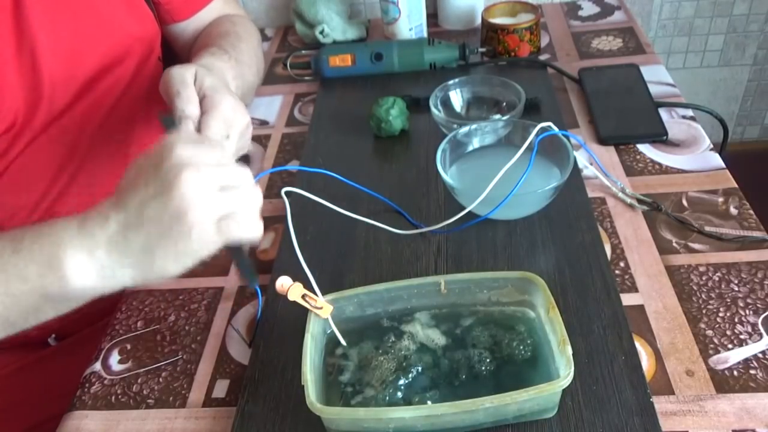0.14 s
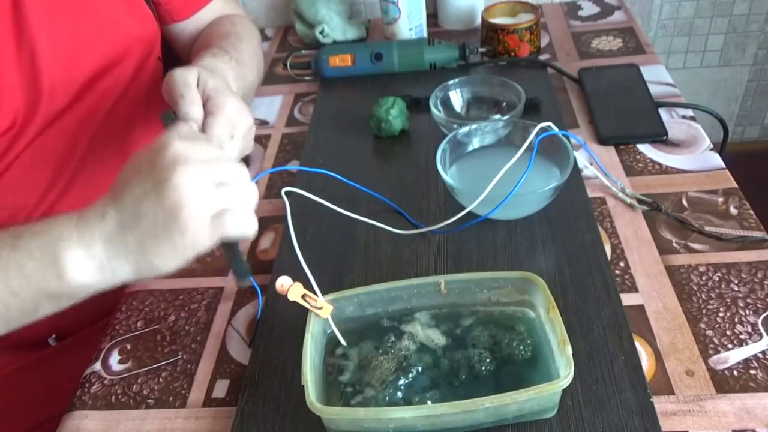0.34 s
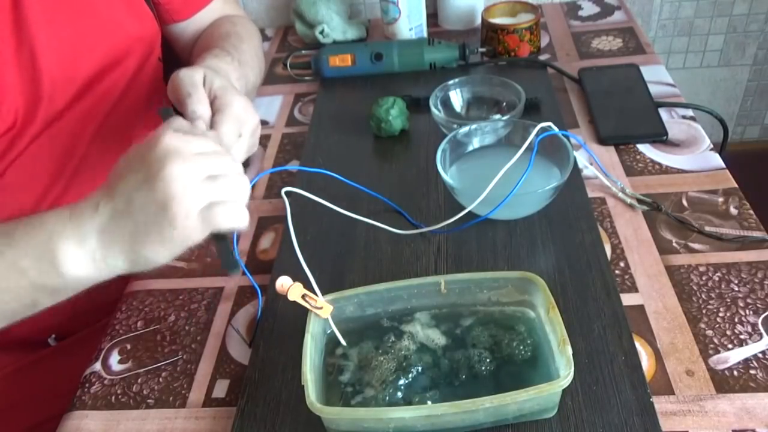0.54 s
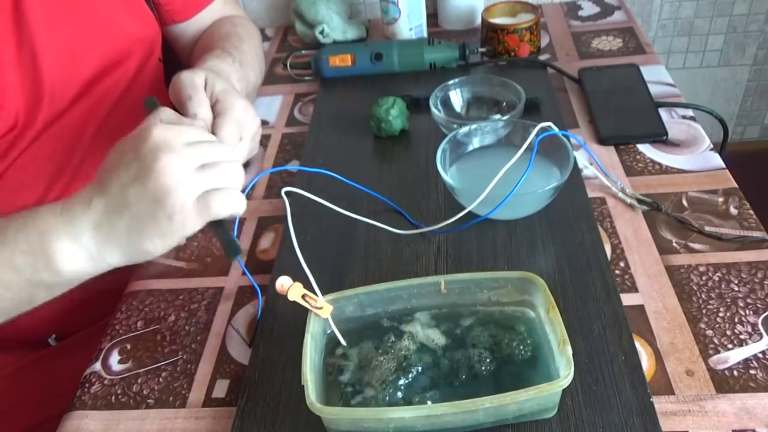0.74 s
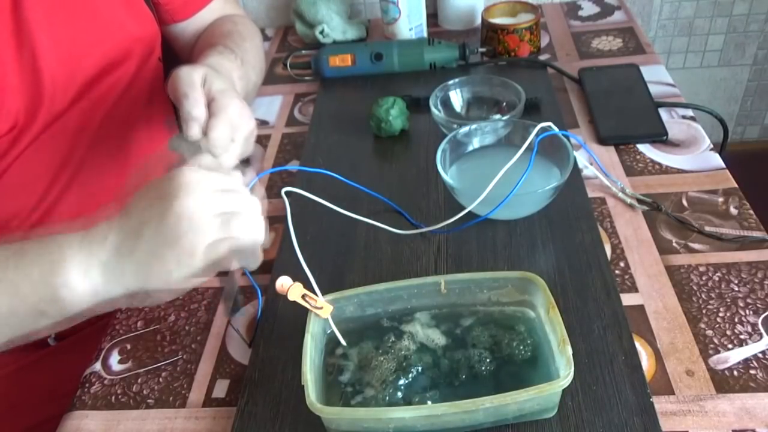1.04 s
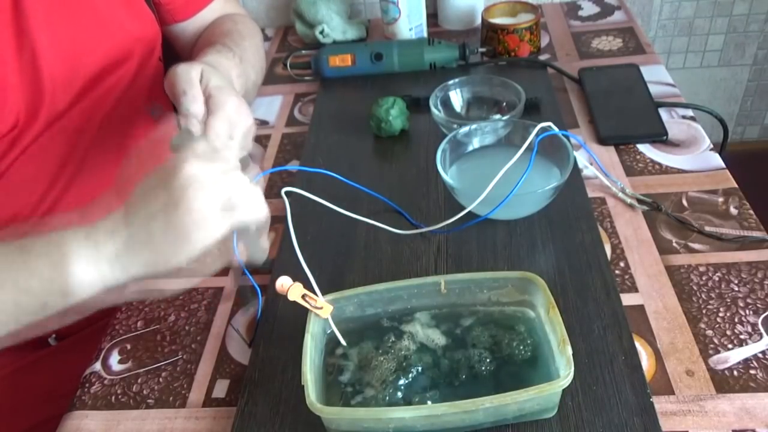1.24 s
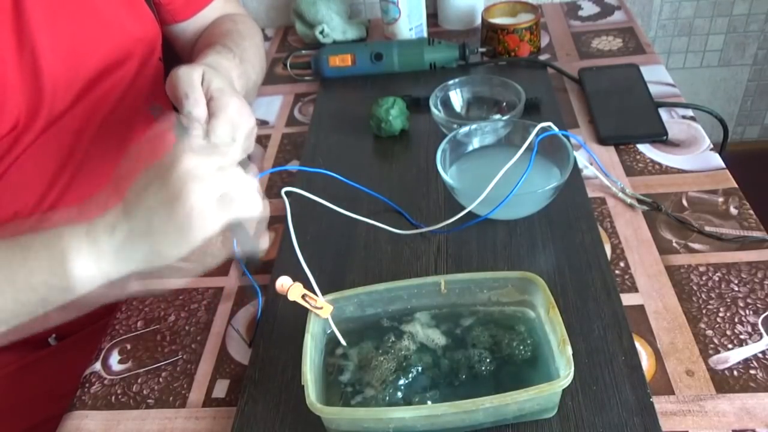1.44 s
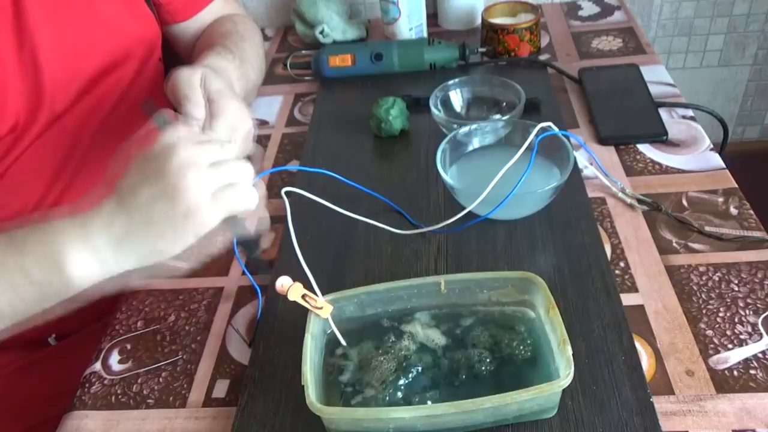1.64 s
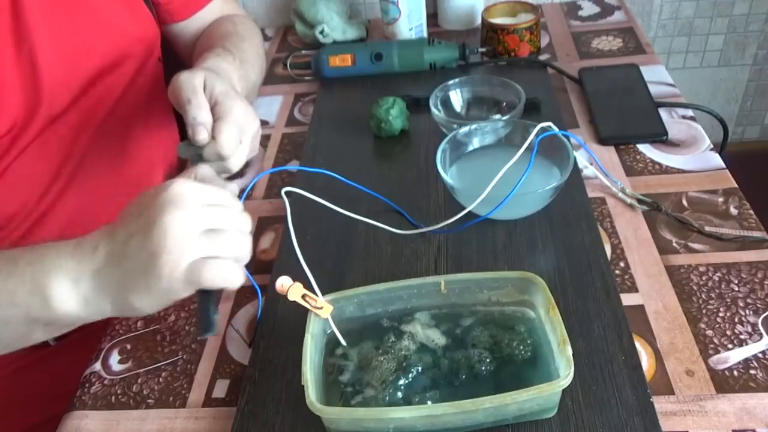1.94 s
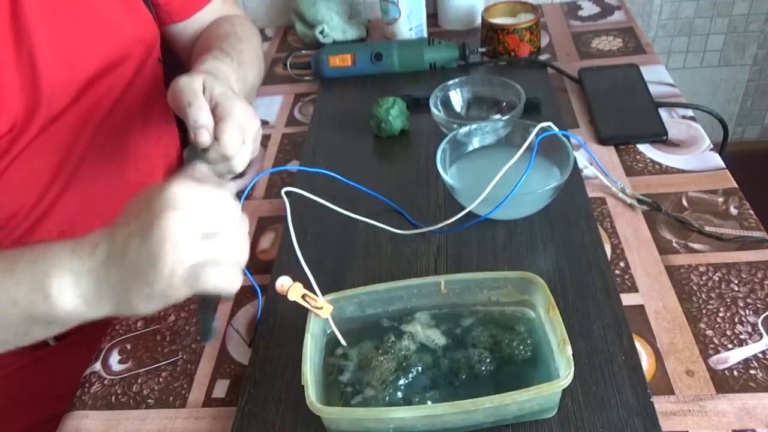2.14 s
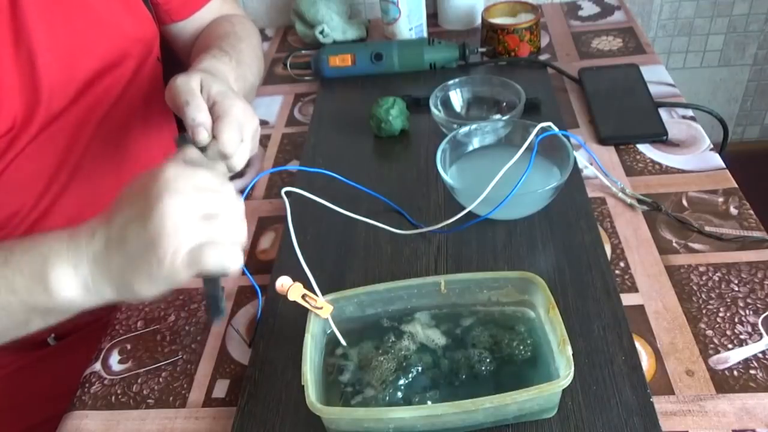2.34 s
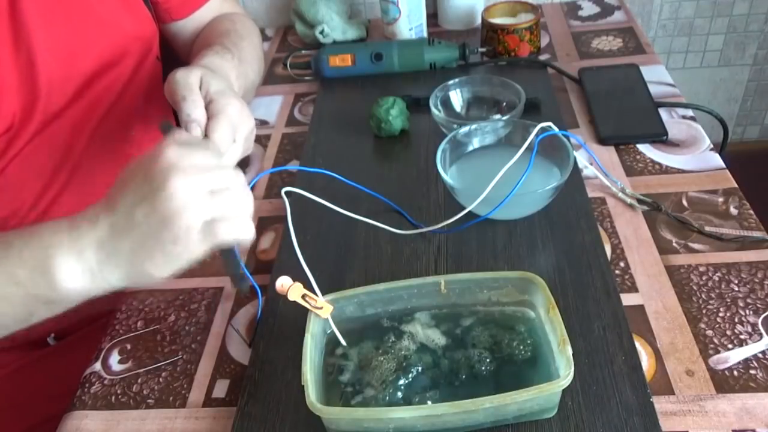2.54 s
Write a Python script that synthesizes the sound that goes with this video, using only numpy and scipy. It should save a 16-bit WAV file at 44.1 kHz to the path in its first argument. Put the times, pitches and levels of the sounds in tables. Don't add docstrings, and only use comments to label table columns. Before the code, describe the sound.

A steel wire brush scrubs a small metal coin in quick, bright, scratchy strokes indoors

```python
import sys
import numpy as np
from scipy import signal
from scipy.fft import rfft, irfft
from scipy.io import wavfile
from scipy.ndimage import uniform_filter1d

SR = 44100
rng = np.random.default_rng(int(sys.argv[2]) if len(sys.argv) > 2 else 0)


def waveform_to_disk(signal):
    frames = np.transpose(np.atleast_2d(signal))
    scaled = np.clip(frames, -1, 1) * 32767
    samples = np.round(scaled).astype(np.int16)
    wavfile.write(sys.argv[1], SR, samples)


def volts(x):
    e = np.asarray(x, float) / 20
    return 10 ** e


N = 119070

# start_s, tick_db, drag_db, tick_pitch_hz
TOUCHDOWNS = [(0.0751, -23, -54, 4830), (0.2828, -22, -49.5, 4500), (0.5023, -20, -54, 6800),
              (0.7284, -30, -51, 7140), (0.9497, -44, -55, 8900), (1.1722, -30, -58.5, 5240),
              (1.381, -49, -51.5, 9330), (1.607, -31, -66, 8700), (1.8382, -29.5, -56, 8200),
              (2.0425, -31, -57, 7430), (2.2697, -37, -68, 9180), (2.4942, -36, -56, 9100)]
# time_s, snap_db, long_wire_pluck_db, shortest_wire_lift_db, ring_pitch_hz
RIM_SNAPS = [(0.1726, -14, -80, 6.5, 2793), (0.371, -5, -42, -11, 2786), (0.5927, -0.5, -41, -11, 3061),
             (0.815, -2, -50, 3, 3070), (1.0348, -8, -75, -5, 3241), (1.256, -16, -44.5, -1.8, 2795),
             (1.4754, -32, -48, -2, 3220), (1.6859, -5.5, -68, -0.3, 3138), (1.9145, -9, -66, 3.6, 2790),
             (2.1308, -4.5, -48, 1.7, 3060), (2.3552, -1, -42, -16, 3026), (2.56, -22, -68, 2.7, 2800)]
# centre_hz, spread_hz, level_db
WIRE_FAMILIES = [(2430, 140, -21), (3112, 300, -13.5), (4185, 430, -16), (4864, 237, -10),
                 (6120, 1540, -18), (7700, 410, -7.5), (9130, 1280, -7.5), (9610, 650, -0.4),
                 (10640, 580, -3.16)]
SLIPS_PER_S = 6000
DRAG_FADE_S = 0.068
ECHO_LIKENESS = 0.7


def across(table, hz):
    f, v = np.array(table, float).T
    return np.interp(np.log(np.maximum(hz, 1)), np.log(f), v)


def shape(x, gain):
    return irfft(rfft(x) * gain(np.arange(N // 2 + 1) * SR / N), N)


def low_cut(hz, order):
    return lambda f: 1 / (1 + (hz / (f + 1)) ** order)


def unit(x):
    return x / np.sqrt(np.mean(x ** 2))


def mode(x, hz, t60):
    r = np.exp(-np.log(1000) / (t60 * SR))
    ring = signal.lfilter([1], [1, -r * np.exp(2j * np.pi * hz / SR)], x).imag
    return np.sqrt(2 * (1 - r * r)) * ring


def band(hz, width):
    return unit(shape(rng.standard_normal(N), lambda f: 1 / (1 + (2 * (f - hz) / width) ** 2)))


def walk(size):
    once = uniform_filter1d(rng.standard_normal(N), size)
    return unit(uniform_filter1d(once, size))


def burst(t, at, fade_s):
    return (t >= at) * np.exp(-np.maximum(t - at, 0) / fade_s)


def pair(make, like):
    mid = shape(make(), lambda f: np.sqrt((1 + np.clip(like(f), 0, 1)) / 2))
    side = shape(make(), lambda f: np.sqrt((1 - np.clip(like(f), 0, 1)) / 2))
    return np.array([mid + side, mid - side])


def hum():
    # frequency_hz, density_db (per Hz)
    air_spectrum = [(25, -27), (110, -10), (531, 0), (1200, 2), (2200, -5), (4000, -6.5), (6500, -10),
                    (11000, -25)]
    # centre_hz, width_hz, level_db
    appliance = [(186.5, 28, -77.5), (121.4, 6.7, -90.5), (1226, 176, -64.5)]
    # frequency_hz, likeness (0 to 1)
    likeness = [(30, .1), (60, .5), (125, 1), (500, 0.1), (1000, 0.37), (4000, 0.37)]

    def room_tone():
        air = unit(shape(rng.standard_normal(N), lambda f: volts(across(air_spectrum, f))))
        return volts(-58) * air + sum(volts(db) * band(hz, width) for hz, width, db in appliance)

    return pair(room_tone, lambda f: across(likeness, f))


def earlier_tail(t):
    def tail():
        colour = sum(volts(db) * band(hz, 2 * spread_hz) for hz, spread_hz, db in WIRE_FAMILIES)
        return colour * volts(-48 - 60 * t / 0.22)

    return pair(tail, lambda f: ECHO_LIKENESS + 0 * f)


def echo(x, t):
    low_t60_s, high_t60_s, level_db = 0.3, 0.18, -8.5

    def tail():
        low = shape(rng.standard_normal(N), lambda f: 1 / np.sqrt(1 + (f / 5000) ** 4))
        high = shape(rng.standard_normal(N), lambda f: 1 / np.sqrt(1 + (5000 / (f + 1)) ** 4))
        build_up = np.clip((t - 0.002) / 0.012, 0, 1)
        h = (low * volts(-60 * t / low_t60_s) + high * volts(-60 * t / high_t60_s)) * build_up
        return signal.fftconvolve(x, h[:SR // 2] / np.sqrt(np.sum(h ** 2)))[:N]

    return volts(level_db) * pair(tail, lambda f: ECHO_LIKENESS + 0 * f)


def light_drag(t, lift_db):
    return sum(volts(drag_db + lift_db) * burst(t, s, DRAG_FADE_S) * (t < s + 0.07)
               for s, _, drag_db, _ in TOUCHDOWNS)


def pressure(t):
    # start_s, length_s, level_db, long_wire_lift_db, swell_db
    strokes = [(0.117, 0.074, -28.5, 1.5, 1.5), (0.326, 0.063, -25, 0.1, 4.5), (0.543, 0.065, -25, -1.2, 6),
               (0.771, 0.062, -26, 2.8, 3.5), (0.992, 0.059, -24.5, 0.7, 5.5), (1.218, 0.057, -27, -0.1, 1),
               (1.431, 0.066, -29, 1.8, 1), (1.651, 0.058, -27.5, 2.2, 2.5), (1.873, 0.062, -28, 0.3, 2.5),
               (2.086, 0.066, -25.5, 1.2, 8), (2.305, 0.071, -29, -0.7, 2), (2.522, 0.075, -26.5, 0.7, 7.5)]
    rise_db_per_s, attack_s, start_db = 885, 0.0053, -1
    release_db_per_s, release_s = 920, 0.017
    out = np.zeros((2, N))
    for s, length, db, long_lift, swell in strokes:
        end = s + length - release_s
        hold = np.interp(t, [s, s + attack_s, end], [start_db - swell, -swell, 0])
        rise = rise_db_per_s * np.maximum(s - t, 0)
        release = release_db_per_s * np.maximum(t - end, 0)
        out += volts(db + hold - rise - release) * volts(np.array([[long_lift], [0]]))
    return out + light_drag(t, 0)


def hand_rub(force):
    # centre_hz, width_hz, level_db
    body = [(566, 420, -35), (1690, 2700, -41.5)]
    rub = force[1] * sum(volts(db) * band(hz, width) for hz, width, db in body)
    return shape(rub, low_cut(300, 4))


def ticks(t):
    signs = rng.choice([-1, 1], size=N)
    out = np.zeros(N)
    for s, db, _, hz in TOUCHDOWNS:
        thin = lambda f: (0.36 + 1 / (1 + ((f - hz) / 1300) ** 2)) / (1 + (3500 / (f + 1)) ** 6)
        out += volts(db - 11) * shape(burst(t, s, 0.0023) * signs, thin)
    return out


def slips(rate):
    happens, sign, size = rng.random((3, N))
    clicks = (happens < rate / SR) * np.sign(sign - 0.5)
    return unit(clicks * volts(-3 * np.log(size + 0.03)))


def grit(t, force):
    strength = light_drag(t, 4) + volts(-17) * force[1]
    return shape(strength * slips(SLIPS_PER_S), low_cut(3800, 6))


def stroke_spans():
    starts = [int(row[0] * SR) for row in TOUCHDOWNS] + [N]
    return list(zip(starts, starts[1:], RIM_SNAPS))


def ringing(t, force):
    # pitch_ratio (times the stroke's ring pitch), level_db, t60_s
    long_wires = [(.94, -4, 0.16), (.965, -2.5, 0.11), (.985, -2.5, 0.16), (1.005, -7.8, 0.16),
                  (1.031, -4.5, 0.083), (1.059, -4, 0.13), (1.095, -0.5, 0.094)]
    rub_db, vary_db, chatter_db = -30.5, 4, 4.5
    out = np.zeros(N)
    pluck = sum(volts(row[2] + 2.5) * np.exp(-np.abs(t - row[0]) / 0.0045) for row in RIM_SNAPS)
    for ratio, db, t60 in long_wires:
        push = (pluck + volts(rub_db) * force[0]) * rng.standard_normal(N)
        chatter = volts(db + chatter_db * walk(size=120))
        for a, b, row in stroke_spans():
            detune, vary = rng.standard_normal(size=2)
            ring = mode(push[a:b], row[4] * ratio * (1 + 0.00784 * detune), t60)
            out[a:b] += volts(vary_db * vary / 2) * chatter[a:b] * ring
    return out


def scratch(t, force):
    bunch_db, wire_vary_db, snap_s, t60_cycles = 2, 2.5, 0.0009, 38
    shared = 0.37
    bunch = volts(bunch_db * walk(size=28))
    snap = sum(volts(row[1] - 13) * np.exp(-np.abs(t - row[0] - snap_s) / snap_s) for row in RIM_SNAPS)
    common, out = slips(SLIPS_PER_S), np.zeros(N)
    for hz, spread_hz, db in WIRE_FAMILIES:
        for place in np.linspace(-1, 1, num=4):
            own = np.sqrt(1 - shared) * slips(SLIPS_PER_S / 2)
            push = np.sqrt(shared) * common * rng.choice([-1, 1]) + own
            push = push * force[int(hz > 4300)] * bunch * volts(wire_vary_db * walk(size=700))
            push = push + snap * volts(-5 * (hz < 7000)) * rng.choice([-1, 1], size=N)
            for a, b, row in stroke_spans():
                here_hz = hz + spread_hz * (place + 0.29 * rng.standard_normal())
                level = volts(db - 11.5 + row[3] * (hz > 10000))
                out[a:b] += level * mode(push[a:b], here_hz, t60_cycles / hz)
    return out


def at_the_ports(brush):
    # frequency_hz, left_minus_right_db
    balance = [(2000, -0.5), (4000, -0.5), (9000, 3)]
    # frequency_hz, level_db
    opposed = [(2000, -9.5), (4000, -10.5), (9000, -14), (11500, -19)]
    near = np.array([shape(brush, lambda f: volts(side * across(balance, f) / 2)) for side in (1, -1)])
    apart = shape(brush, lambda f: 1j * volts(across(opposed, f)))
    return near + apart * np.array([[1], [-1]])


def scene():
    t = np.arange(N) / SR
    force = pressure(t)
    metal = scratch(t, force) + ringing(t, force) + ticks(t) + grit(t, force)
    brush = shape(metal, low_cut(1847, 6)) + hand_rub(force)
    return at_the_ports(brush) + echo(brush, t) + earlier_tail(t) + hum()


def band_limit(x):
    return signal.sosfilt(signal.butter(12, 12180, fs=SR, output="sos"), x)


def record(dry):
    steep = signal.cheby1(15, 0.5, 10944, fs=SR, output="sos")
    return band_limit(signal.sosfilt(steep, dry))


dry = scene()
out = record(dry)
waveform_to_disk(out)
```